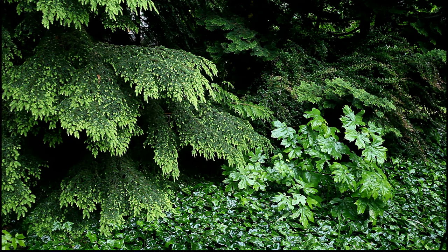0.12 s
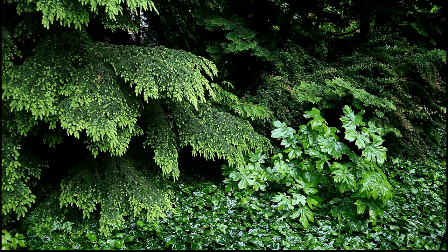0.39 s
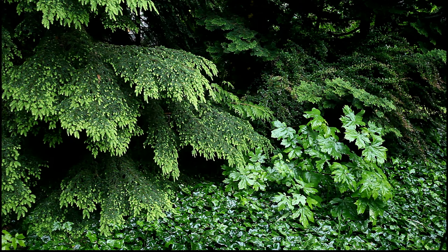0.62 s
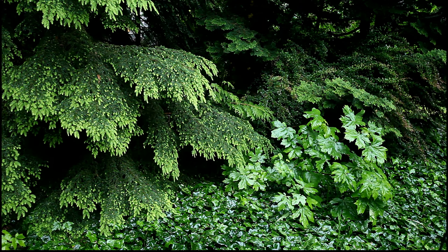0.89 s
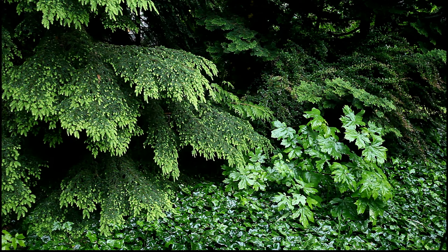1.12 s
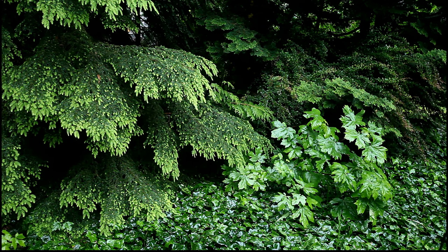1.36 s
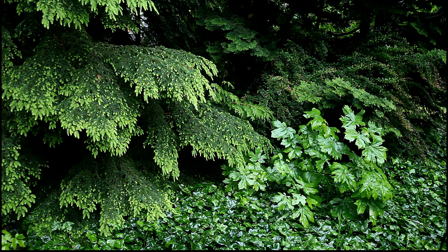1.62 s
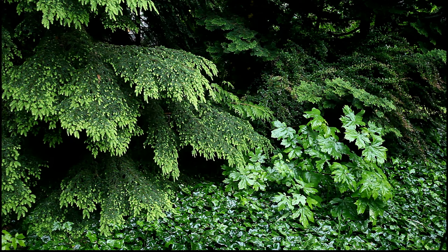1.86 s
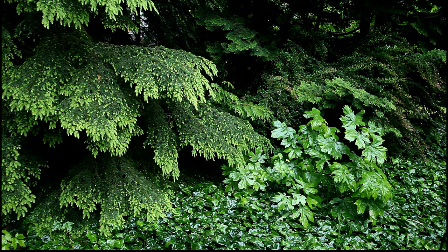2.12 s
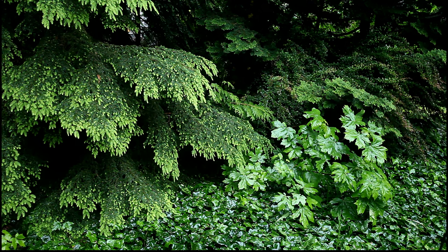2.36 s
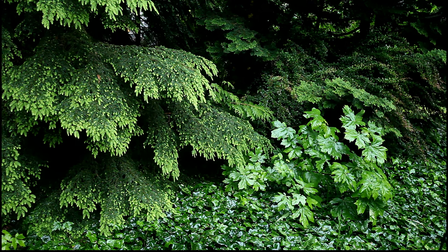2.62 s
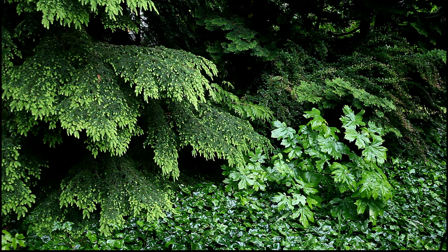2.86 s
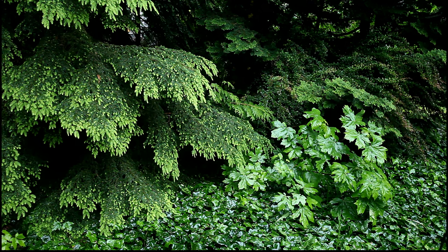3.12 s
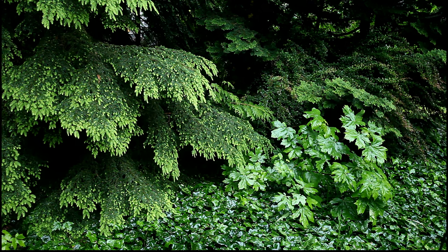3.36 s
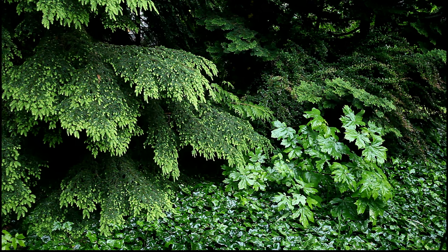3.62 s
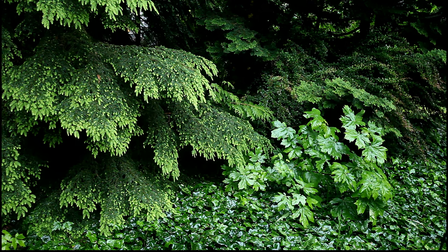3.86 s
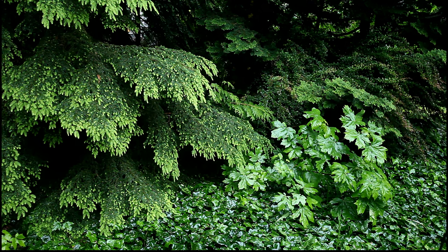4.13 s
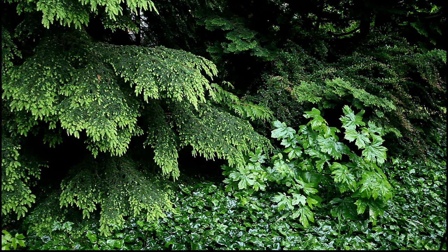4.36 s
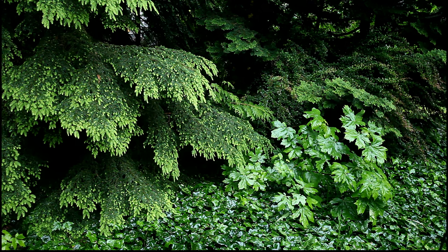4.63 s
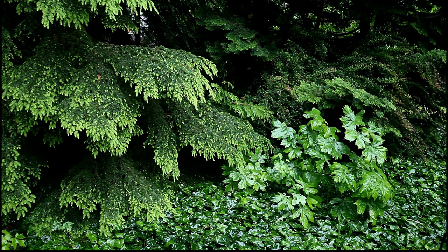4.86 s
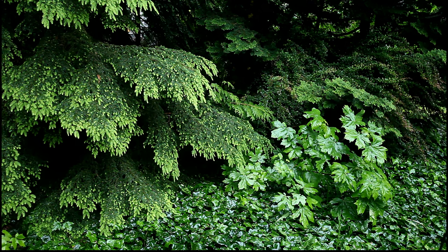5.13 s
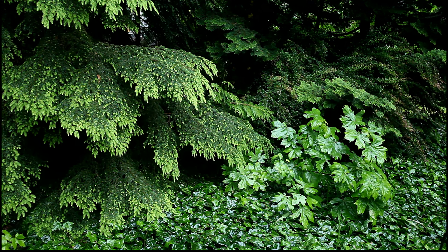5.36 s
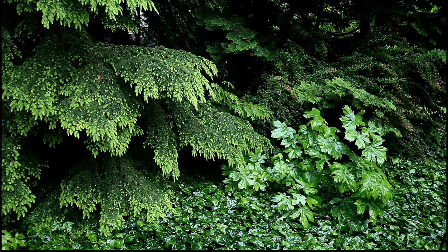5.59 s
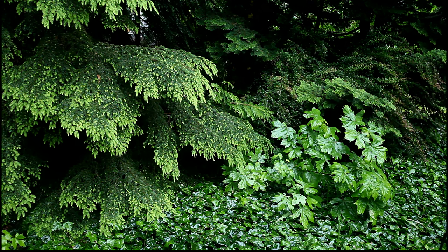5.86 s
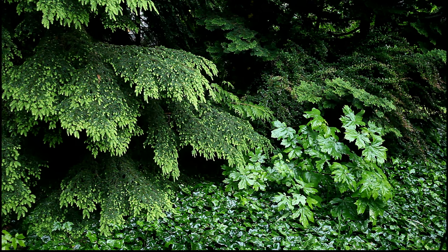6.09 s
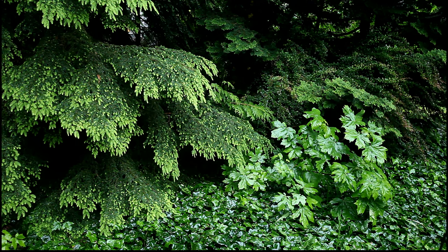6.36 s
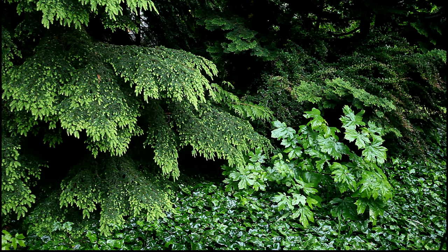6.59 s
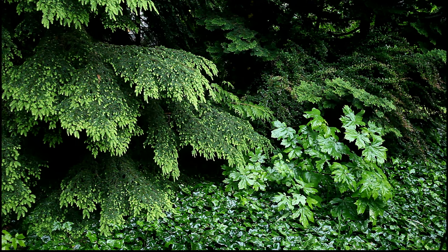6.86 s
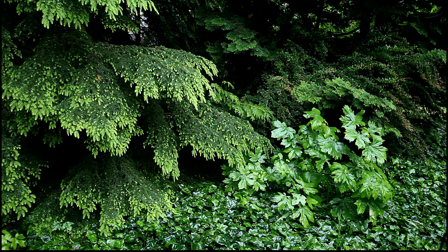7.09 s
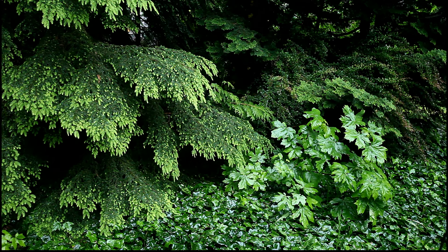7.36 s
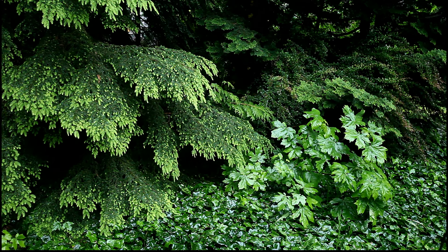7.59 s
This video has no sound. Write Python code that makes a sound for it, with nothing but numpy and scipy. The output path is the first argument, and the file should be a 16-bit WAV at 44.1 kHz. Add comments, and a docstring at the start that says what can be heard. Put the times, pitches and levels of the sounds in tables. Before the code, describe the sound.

Raindrops tick and splat irregularly on wet foliage under a small resonant shelter, with distant rain hissing behind and a brief falling bird call late.

```python
"""A wood in steady rain, heard from under a small shelter: near drops splat on leaves as enveloped noise bursts
through resonances, many smaller ones patter behind them, heavy ones land with a low knock.
Standing waves and a short noise tail make the shelter ring after every drop. Behind lie a far hiss and a low
rumble of shaped noise; a far bird whistles one broken, falling call of sine notes."""
import sys
import numpy as np
from scipy import signal
from scipy.fft import rfft, irfft, next_fast_len
from scipy.io import wavfile
from scipy.ndimage import uniform_filter1d, map_coordinates

SR = 44100
rng = np.random.default_rng(int(sys.argv[2]) if len(sys.argv) > 2 else 0)


def wrap_up_sound(samples):
    """Save the sound to the file named by the first command line argument, as 16-bit audio."""
    columns = np.atleast_2d(samples).T
    # keep every value between -1 and 1, then stretch to whole-number steps
    tamed = np.clip(columns, -1, 1)
    steps = np.round(tamed * 32767).astype(np.int16)
    wavfile.write(sys.argv[1], SR, steps)


def gain_from_db(level_db):
    """Turn a decibel level (scalar or array-like) into a linear amplitude factor."""
    decades = np.asarray(level_db, float) / 20
    return 10 ** decades


N = 340893


def unit(x):
    """Scaled to rms 1."""
    return x / np.sqrt(np.mean(x ** 2) + 1e-20)


def along(points, hz):
    """(Hz, value) points interpolated on a log frequency axis."""
    point_hz, value = np.transpose(points)
    return np.interp(np.log(hz + 1), np.log(point_hz + 1), value)


def wobble(knots_per_s):
    """A smooth curve through random knots."""
    knots = rng.standard_normal(int(N * knots_per_s / SR) + 4)
    return map_coordinates(knots, [np.arange(N) * knots_per_s / SR])


def filtered(x, response):
    """x through a complex response of frequency in Hz."""
    size = next_fast_len(x.shape[-1] + 2048)
    spectrum = rfft(x, size) * response(np.fft.rfftfreq(size, 1 / SR))
    return irfft(spectrum, size)[..., :x.shape[-1]]


def resonance(f, hz, width_hz):
    """One causal resonance, gain 1 at its centre."""
    return 1j * f * width_hz / (hz * hz - f * f + 1j * f * width_hz)


def rush(spectrum, patchy_db):
    """Shaped noise of rms 1, its gain patchy over time and frequency."""
    z = signal.stft(rng.standard_normal(N + 512), nperseg=512)[2]
    field = uniform_filter1d(rng.standard_normal(z.shape), size=6, axis=0)
    field = uniform_filter1d(field, size=8, axis=1)
    noise = signal.istft(z * gain_from_db(patchy_db * unit(field)), nperseg=512)[1][:N]
    return unit(filtered(noise, lambda f: gain_from_db(along(spectrum, f))))


def faint(count, low_hz, high_hz):
    """Random start_s, pitch_hz and two bounded scatters for the drops that are not listed."""
    u = rng.random((count, 2))
    scatter = np.clip(rng.standard_normal((count, 2)), -3, 1.3)
    start_s = u[:, 0] * N / SR
    pitch_hz = low_hz * (high_hz / low_hz) ** u[:, 1]
    return start_s, pitch_hz, scatter[:, 0], scatter[:, 1]


def clumped(u, knots_per_s, depth_db):
    """Even chance 0-1 turned into moments in s that crowd together in flurries."""
    crowd = np.cumsum(gain_from_db(depth_db * wobble(knots_per_s)))
    return np.interp(u, crowd / crowd[-1], np.arange(N) / SR)


def splats(start_s, peak_db, pitch_hz, sharp, t60_s, rise_s, uneven):
    """Each drop: a sharp impact and a noise burst ring one broad resonance; some smear out longer."""
    t = np.arange(640) / SR
    draw = rng.standard_normal((len(start_s), len(t) + 1))
    smear = np.exp(np.clip(uneven * draw[:, :1], -1, 1))  # stretches rise and decay
    decay = gain_from_db(-60 * t / (t60_s * smear))
    burst = draw[:, 1:] * decay * (1 - np.exp(-t / (rise_s * smear)))
    burst[:, 12] += 0.75 * np.linalg.norm(burst, axis=1) / smear[:, 0]  # impact
    hz = np.asarray(pitch_hz)[:, None]
    ring = filtered(burst, lambda f: resonance(f, hz, hz / sharp) ** 3)
    ring *= gain_from_db(peak_db)[:, None] / np.abs(ring).max(axis=1, keepdims=True)
    at = np.round(np.asarray(start_s) * SR).astype(int)[:, None] + np.arange(len(t))
    return np.bincount(np.clip(at, 0, N).ravel(), ring.ravel(), N + 1)[:N]


# clearest near drops on leaves: start_s, spray_peak_db, slap_peak_db, leaf_hz
NEAR_DROPS = [(0.0353, -27.5, -34, 4730), (0.092, -22.5, -49, 4820), (0.1593, -22, -28, 4500),
              (0.192, -29, -49, 4000), (0.244, -35, -45, 4000), (0.291, -35, -53, 4000),
              (0.322, -34.5, -40, 4000), (0.459, -28, -31, 5090), (0.474, -35, -39, 4000),
              (0.5195, -28.5, -49, 5170), (0.6013, -28, -39, 4250), (0.623, -28, -37, 4000),
              (0.663, -27.5, -36.5, 2720), (0.779, -29, -35, 4000), (0.809, -30, -30.5, 3800),
              (0.834, -26.5, -33, 5090), (0.868, -31, -43, 4100), (0.883, -36, -48, 4000),
              (0.931, -31, -44, 4000), (0.952, -34, -52, 4000), (0.978, -16.5, -17.5, 3460),
              (1.007, -29, -30.5, 4830), (1.096, -29, -34, 5000), (1.125, -34, -52, 3970),
              (1.217, -27.5, -34, 4550), (1.249, -32, -43, 4000), (1.293, -50, -33.5, 2940),
              (1.3163, -29, -29, 3900), (1.325, -26, -28, 5100), (1.362, -29, -30, 5130),
              (1.455, -31, -36, 4070), (1.4913, -23.5, -35, 2800), (1.6256, -27.5, -31.5, 2840),
              (1.673, -32, -37, 4000), (1.72, -33, -33.5, 2200), (1.737, -27, -38, 2090),
              (1.788, -38, -28.5, 4100), (1.807, -31, -44, 4000), (1.85, -25.5, -49, 4690),
              (1.871, -27, -42, 3700), (1.916, -23.5, -41.5, 2480), (2.097, -27.5, -38, 2640),
              (2.238, -34.5, -52, 4000), (2.275, -36, -42, 4000), (2.296, -28, -42, 4000),
              (2.308, -31.5, -33.5, 4740), (2.337, -37, -31.5, 4000), (2.38, -23.5, -36, 4070),
              (2.423, -30, -30.5, 3630), (2.4492, -25, -28.5, 5100), (2.537, -33, -36.5, 4030),
              (2.586, -33, -41, 2720), (2.6497, -30, -31, 4800), (2.672, -33, -44, 4000),
              (2.761, -26, -35, 5090), (2.809, -26, -30, 4380), (2.832, -32, -52, 4790),
              (2.844, -34, -50, 4000), (2.869, -29, -32.5, 3150), (2.938, -36, -59, 4000),
              (3.028, -31, -50, 4000), (3.069, -31, -35, 3950), (3.172, -32, -29.5, 5070),
              (3.2027, -31, -32, 4740), (3.259, -29, -37, 4000), (3.2734, -29.5, -53, 2170),
              (3.293, -31, -36, 2570), (3.336, -22, -30.5, 4370), (3.37, -30, -49, 4000),
              (3.401, -33, -28, 4570), (3.521, -30, -30, 2770), (3.537, -26, -41, 2660),
              (3.603, -25.5, -36, 2260), (3.652, -24.5, -34.5, 2460), (3.666, -27, -45, 4000),
              (3.724, -29, -53, 4000), (3.762, -31.5, -32.5, 2520), (3.9027, -25, -31, 5030),
              (3.9137, -23, -39, 5090), (3.936, -35, -41, 4000), (3.945, -45, -26.5, 4650),
              (3.985, -33.5, -42, 4000), (4.0678, -24, -47, 5090), (4.093, -29, -35, 4300),
              (4.133, -30, -36, 3820), (4.163, -28.5, -34, 4000), (4.226, -23.5, -26.5, 2980),
              (4.268, -32, -24, 4260), (4.283, -28, -48, 4000), (4.2951, -27.5, -28.5, 4780),
              (4.361, -31.5, -35, 2600), (4.4138, -15, -20.5, 4200), (4.587, -40, -53, 4020),
              (4.629, -32, -35, 3640), (4.704, -30.5, -36, 5060), (4.73, -30, -34.5, 4000),
              (4.809, -25.5, -28, 3170), (4.891, -39, -38, 4000), (4.92, -25, -32, 4100),
              (4.958, -35, -41, 4000), (4.979, -30, -36, 4530), (5.003, -25, -40.5, 5090),
              (5.177, -30, -30.5, 3900), (5.3063, -27, -18, 4720), (5.369, -30.5, -49, 4000),
              (5.458, -30, -29.5, 4380), (5.5185, -31, -29, 4040), (5.574, -30, -46, 4000),
              (5.6155, -26, -32, 4100), (5.63, -23, -32.5, 3220), (5.702, -26, -28, 3000),
              (5.7173, -23.5, -37, 2800), (5.746, -27, -33, 4900), (5.784, -30, -37, 2540),
              (5.92, -32, -38, 4500), (5.965, -29, -47, 4000), (5.988, -34, -36, 5000),
              (6.037, -31, -40, 4000), (6.106, -34, -34.5, 2280), (6.1437, -23, -33, 3180),
              (6.184, -31, -41, 4000), (6.256, -34, -35, 4500), (6.281, -37, -39, 4020),
              (6.315, -34, -33, 5000), (6.34, -32.5, -36.5, 4000), (6.3822, -20.5, -36, 4000),
              (6.4872, -25.5, -38, 2800), (6.5483, -22.5, -21, 5100), (6.642, -28.5, -52, 4000),
              (6.6502, -41, -28.5, 3900), (6.689, -26, -46, 3800), (6.72, -33, -52, 4000),
              (6.7575, -24.5, -27.5, 2730), (6.883, -34, -35, 3500), (6.908, -29, -32, 3400),
              (6.934, -32, -49, 4000), (6.96, -35, -44, 4000), (7.028, -30, -39, 4000),
              (7.044, -28, -31, 4840), (7.09, -42, -38, 2570), (7.128, -33, -44, 4000),
              (7.233, -26, -33.5, 3800), (7.287, -30, -53, 5090), (7.354, -34, -33, 4180),
              (7.402, -32, -32, 4230), (7.437, -51, -37, 2660), (7.483, -35, -35, 4320),
              (7.517, -31, -26.5, 3760), (7.652, -30.5, -38.5, 4000), (7.673, -37, -52, 4000)]


def near_drops():
    """The leaf slaps at its own pitch, water sprays in the treble, a fine mist ticks above that."""
    faint_spray_db, faint_slap_db, spray_scatter_db, slap_scatter_db = -38, -45, 3.5, 3.5
    middling_mist_db, mist_db_per_spray_db, mist_scatter_db = -42, 0.73, 2.5
    at_s, hz, wet, hard = faint(count=60, low_hz=2180, high_hz=4960)
    chance = [at_s, faint_spray_db + spray_scatter_db * wet, faint_slap_db + slap_scatter_db * hard, hz]
    start_s, spray_db, slap_db, leaf_hz = np.hstack([np.transpose(NEAR_DROPS), chance])
    mist_db = middling_mist_db + mist_db_per_spray_db * (spray_db - spray_db.mean())
    mist_db = mist_db + mist_scatter_db * np.clip(rng.standard_normal(len(start_s)), -2, 1.5)
    mist_hz = np.full(len(start_s), 10100)
    spray_hz = 7050 * np.exp(0.045 * rng.standard_normal(len(start_s)))
    spray = splats(start_s, spray_db, spray_hz, sharp=2.52, t60_s=0.011, rise_s=0.0005, uneven=0.3)
    mist = splats(start_s, mist_db, mist_hz, sharp=1.5, t60_s=0.016, rise_s=0.00033, uneven=0.88)
    slap = splats(start_s, slap_db, leaf_hz, sharp=1.45, t60_s=0.007, rise_s=0.0007, uneven=0.2)
    return spray + mist + slap


# heavy drops: start_s, peak_db, brightest_hz
HEAVY_DROPS = [(0.291, -39, 1620), (0.836, -39.5, 810), (0.869, -44, 1050), (0.9765, -36, 1800),
               (1.124, -48, 875), (1.524, -41, 1530), (1.622, -45, 810), (2.038, -41.5, 960),
               (2.097, -42, 1100), (2.151, -34, 1500), (2.449, -37, 1130), (3.115, -46.5, 895),
               (3.243, -45, 1300), (3.4, -37, 1280), (3.516, -42, 1280), (3.652, -36.5, 1000),
               (4.296, -30.5, 960), (4.413, -33.5, 880), (4.448, -47, 796), (4.698, -43.5, 1160),
               (5.235, -40.5, 1080), (5.783, -35, 1230), (6.1445, -33, 840), (6.16, -42, 1500),
               (6.758, -39, 1100), (7.131, -49, 690), (7.155, -38.5, 1700), (7.517, -33, 1860),
               (7.546, -50, 750)]


def knocks():
    """Heavy drops land with a dull low blow, lighter ones at random among them."""
    at_s, pitch_hz, size, _ = faint(count=12, low_hz=670, high_hz=1440)
    chance = [at_s, -52 + 0.75 * size, pitch_hz]
    start_s, peak_db, brightest_hz = np.hstack([np.transpose(HEAVY_DROPS), chance])
    return splats(start_s, peak_db, brightest_hz, sharp=0.75, t60_s=0.004, rise_s=0.0003, uneven=0.15)


# tone weighting of the small drops: freq_hz, relative_gain_db
PATTER_TONE = [(710, -6), (1200, -9), (1840, -14), (5800, -0.5), (6570, 3.5), (9850, 1), (14300, -38)]


def small_drops(grain_rms_db=-52, tick_rms_db=-66, spread_db=4, count=2200):
    """Many small drops in flurries, few of them large, each a pitched grain and a bright tick."""
    u = rng.random((count, 4))
    start_s = clumped(u[:, 0], 30, depth_db=3)
    size_db = np.minimum(-spread_db * np.log(u[:, 1] + 1e-9), 8)
    grain_hz, tick_hz = 1500 * 8.2 ** u[:, 2], 8500 * 0.58 ** u[:, 3]
    grains = splats(start_s, size_db, grain_hz, sharp=0.84, t60_s=0.005, rise_s=0.0007, uneven=0.6)
    ticks = splats(start_s, size_db, tick_hz, sharp=0.65, t60_s=0.029, rise_s=0.00048, uneven=0.29)
    grains = filtered(grains, lambda f: gain_from_db(along(PATTER_TONE, f)))
    return gain_from_db(grain_rms_db) * unit(grains) + gain_from_db(tick_rms_db) * unit(ticks)


# standing waves under the shelter: mode_hz, relative_gain_db
STANDING_WAVES = [(657, 7), (845, 7.5), (1050, 2), (1145, 6.5), (1585, 0), (2121, 2), (2258, -7.5),
                  (2640, 4.5), (2909, -13), (4280, 2.5), (4925, -6.5), (5415, 3.5), (6359, -4.5), (7779, 2)]
# decay of the dense answer: freq_hz, t60_s
TAIL_DECAY = [(600, 0.64), (3000, 0.19), (9000, 0.092)]


def dense_answer(delay_s=0.002, early_end_s=0.029, early_fade_s=0.011, early_db=2):
    """Decaying noise of unit energy, its early part raised, then fading to the later level."""
    hz, t, z = signal.stft(rng.standard_normal(SR // 3), SR, nperseg=128)
    tail = signal.istft(z * gain_from_db(-60 * t / along(TAIL_DECAY, hz)[:, None]), SR, nperseg=128)[1]
    tail *= gain_from_db(early_db * np.clip((early_end_s - np.arange(len(tail)) / SR) / early_fade_s, 0, 1))
    return np.pad(tail / np.linalg.norm(tail), (int(delay_s * SR), 0))


def standing_waves(f, shift_db):
    """Sum of narrow resonances of alternating sign, their gains shifted by the given dB."""
    total = 0
    for k, (mode_hz, gain_db) in enumerate(STANDING_WAVES):
        mode = resonance(f, mode_hz, 35 + 0.014 * mode_hz)
        total = total + (-1) ** k * gain_from_db(gain_db + shift_db[k]) * mode
    return total


def shelter(x, tail_db=-4, modes_db=5, vary_gain_db=2.5):
    """Modes ring on and a dense answer follows every drop; noise and mode gains are redrawn each 1/8 s."""
    out, step = np.zeros(N + SR), SR // 8
    for at in range(0, N, step):
        part = np.pad(x[at:at + step], (0, SR // 2))
        tail = signal.fftconvolve(part, dense_answer())[:len(part)]
        shift_db = vary_gain_db * rng.standard_normal(len(STANDING_WAVES))
        modes = filtered(part, lambda f: standing_waves(f, shift_db))
        out[at:at + len(part)] += gain_from_db(tail_db) * tail + gain_from_db(modes_db) * modes
    return x + out[:N]


# far rain level: time_s, level_db
FAR_LEVEL = [(0.0, -50), (5.45, -49.5), (6.59, -49.5), (7.73, -54.5)]
# far rain spectrum: freq_hz, relative_density_db
FAR_SPECTRUM = [(260, -46), (450, -14.5), (675, -6), (928, -8), (1120, -7), (1290, -9.5), (2590, -7.5),
                (3080, -11.5), (5600, -6.5), (7300, -2), (9800, -16), (11800, -16), (14400, -16.5)]


def far_rain():
    """Drops too far and many to tell apart merge into a hiss that wavers a little and sinks at the end."""
    level_db = np.interp(np.arange(N) / SR, *np.transpose(FAR_LEVEL))
    return gain_from_db(level_db + 0.38 * wobble(24)) * rush(FAR_SPECTRUM, patchy_db=2.0)


# whistled notes: start_s, length_s, pitch_hz, level_db (at the start), swell_db (change while held)
BIRD_NOTES = [(6.77, .062, 2730, -55.5, -1), (6.845, .06, 2715, -54, -1), (6.915, .045, 2480, -57.5, 0),
              (6.97, .08, 2450, -64, -2)]


def bird(edge_s=0.015):
    """A thin broken, falling whistle of sines with wavering pitch and fluttering level."""
    t = np.arange(N) / SR
    waver_rad = 2 * np.pi * np.cumsum(20 * wobble(60)) / SR
    flutter_db = 1.2 * wobble(55)
    notes = 0
    for start_s, length_s, pitch_hz, level_db, swell_db in BIRD_NOTES:
        edges = np.clip(np.minimum(t - start_s, start_s + length_s - t) / edge_s + 0.5, 0, 1)
        held = np.clip((t - start_s) / length_s, 0, 1)
        tone = np.sin(2 * np.pi * pitch_hz * t + waver_rad)
        notes = notes + edges * gain_from_db(level_db + swell_db * held) * tone
    return gain_from_db(flutter_db) * np.sqrt(2) * notes


# rumble spectrum: freq_hz, relative_density_db
RUMBLE_SPECTRUM = [(12, -43), (20, -13.5), (59, -4), (114, 0.5), (176, -3.5), (228, 3), (303, -2.5),
                   (403, -3.5), (600, -10), (780, -10), (1320, -120)]


def rumble():
    """Low shaped noise with a hum of narrow-band noise in it, both slowly fading."""
    start_db, fade_db_per_s = -60.5, 0.27
    hum_start_db, hum_fade_db_per_s = -70.5, 1.5
    t = np.arange(N) / SR
    hum = unit(filtered(rng.standard_normal(N), lambda f: resonance(f, 80.6, 10.0) ** 2))
    low = gain_from_db(start_db - fade_db_per_s * t) * rush(RUMBLE_SPECTRUM, patchy_db=1.07)
    return low + gain_from_db(hum_start_db - hum_fade_db_per_s * t) * hum


def scene():
    """Near drops sound in the shelter, the far sounds behind them."""
    drops = near_drops() + knocks() + small_drops()
    return (shelter(drops) + far_rain() + bird() + rumble())[None]


def low_pass(x):
    """Removes everything above the highest recorded frequency."""
    return signal.sosfilt(signal.butter(12, 15420, fs=SR, output="sos"), x)


# microphone treble roll-off: freq_hz, gain_db
MIC_ROLLOFF = [(10500, 0), (14400, -8.5)]
# band limit: freq_hz, gain_db
BAND_LIMIT = [(14480, 0), (14600, -26), (15400, -44), (17000, -60)]


def record(dry):
    """The microphone loses the top treble up to a hard band limit."""
    mix = filtered(dry, lambda f: gain_from_db(along(MIC_ROLLOFF, f) + along(BAND_LIMIT, f)))
    return low_pass(mix)


dry = scene()
out = record(dry)
wrap_up_sound(out)
```